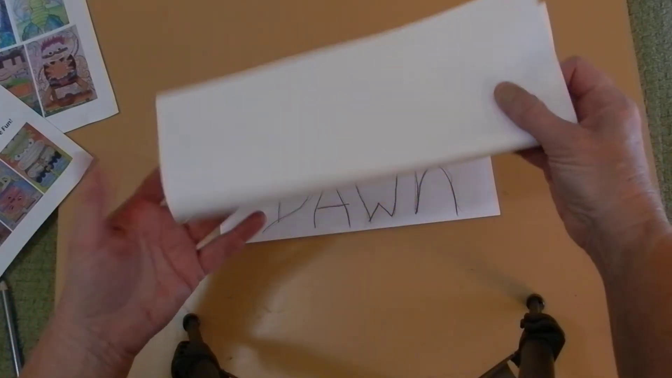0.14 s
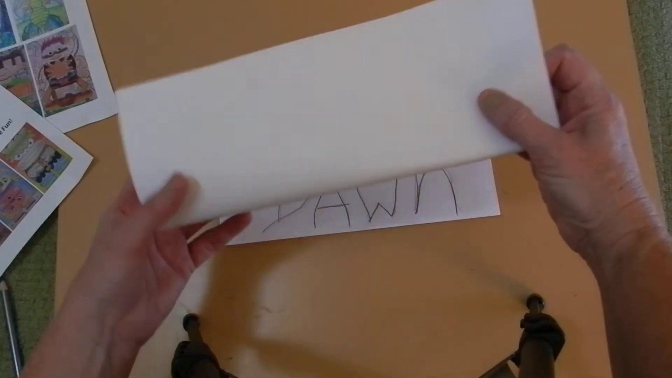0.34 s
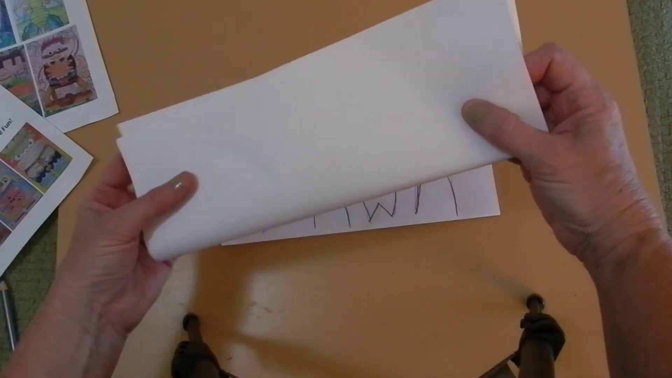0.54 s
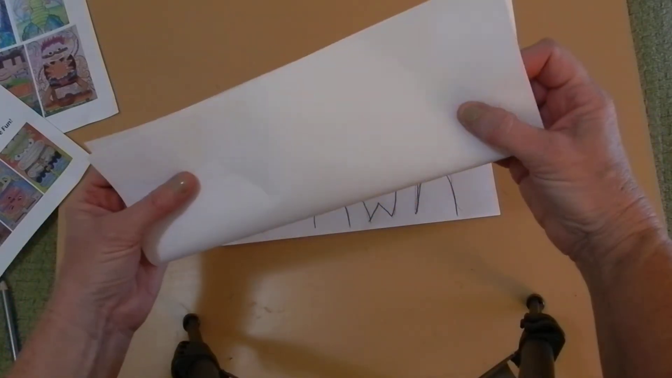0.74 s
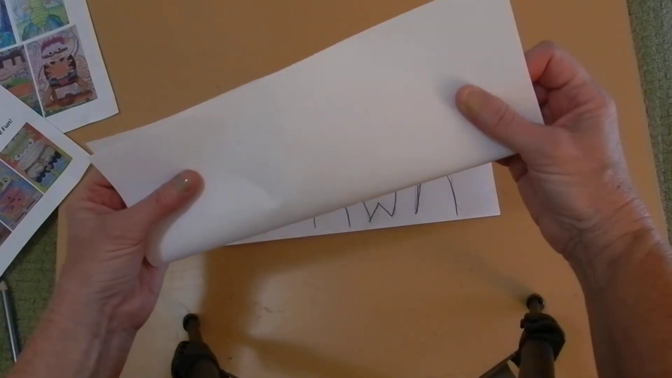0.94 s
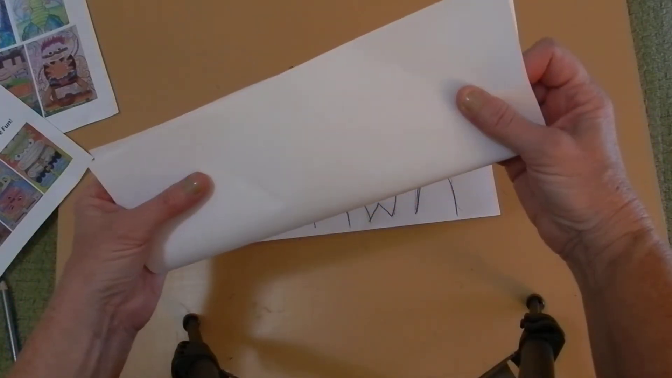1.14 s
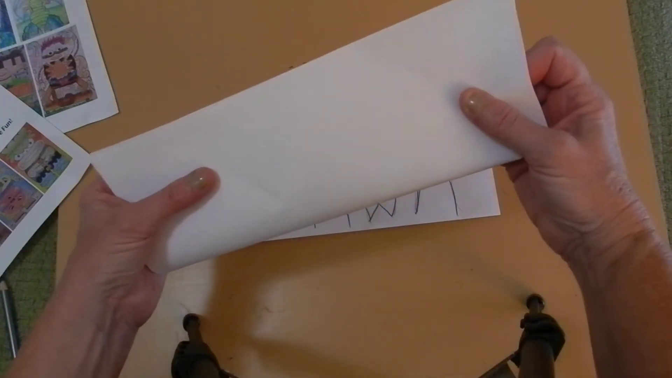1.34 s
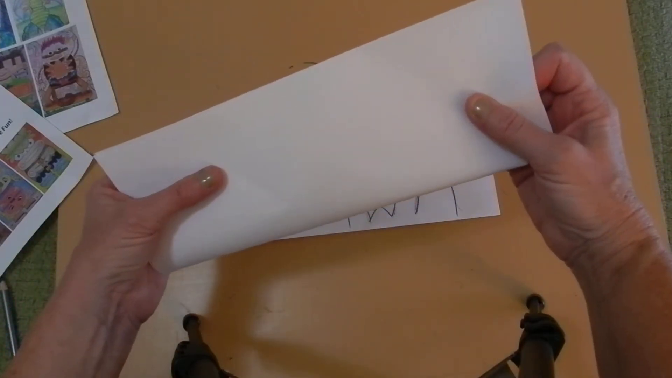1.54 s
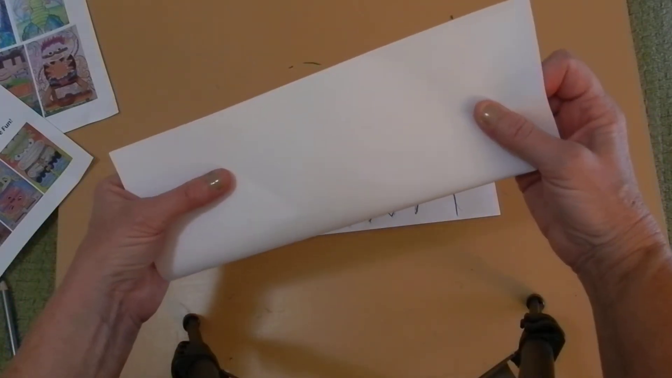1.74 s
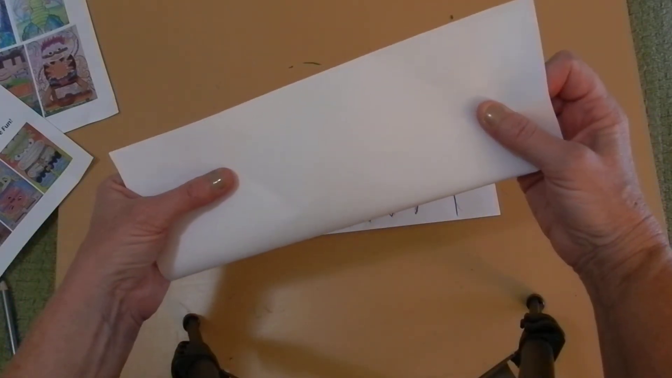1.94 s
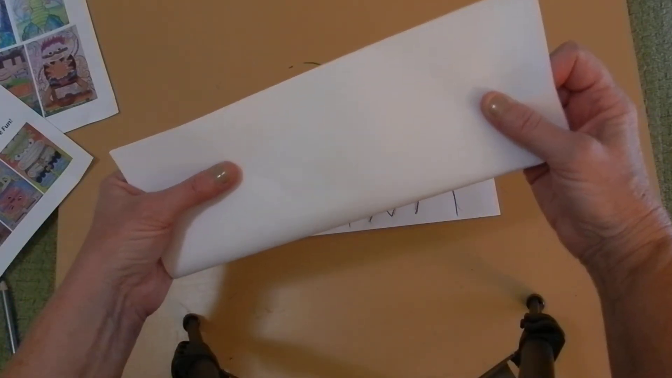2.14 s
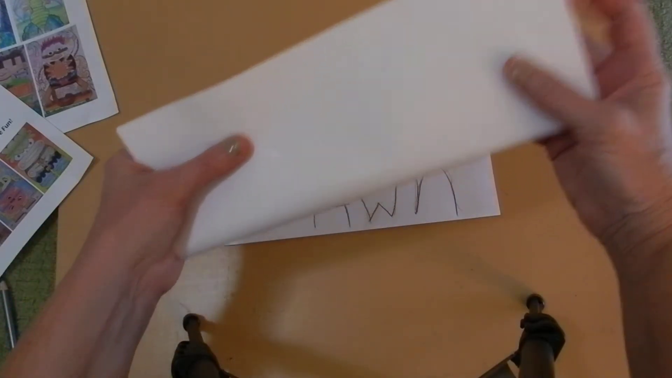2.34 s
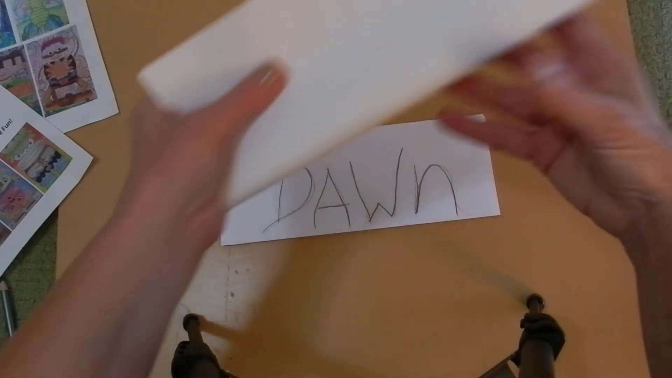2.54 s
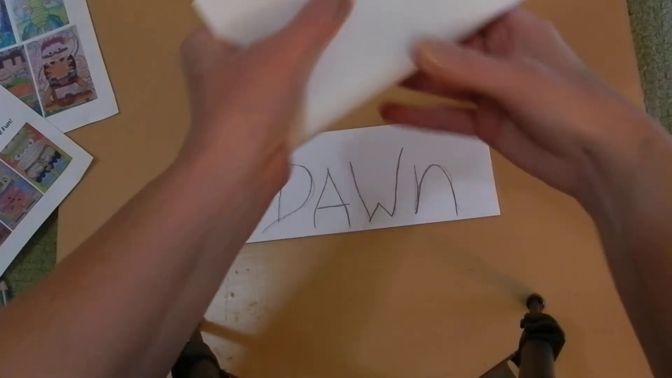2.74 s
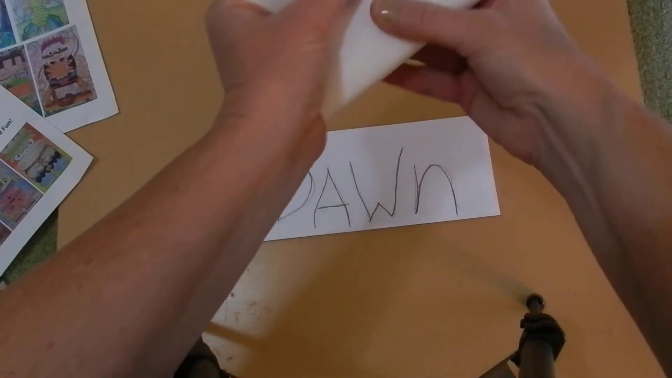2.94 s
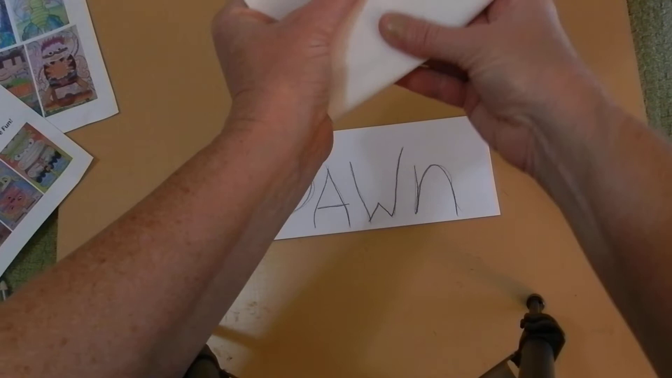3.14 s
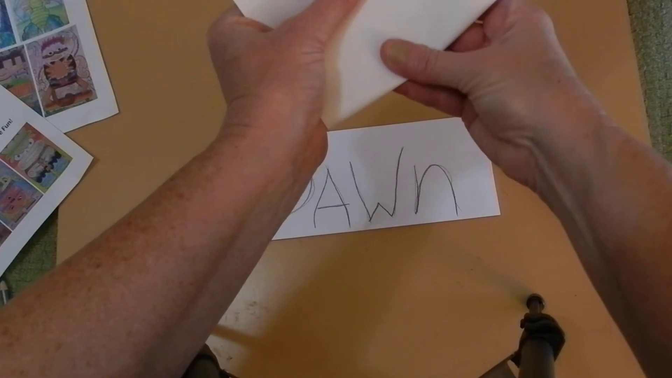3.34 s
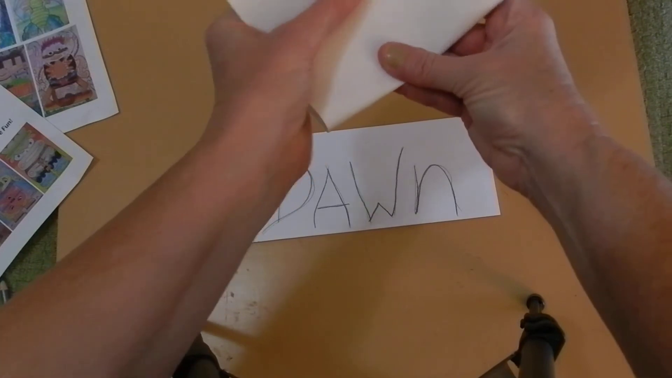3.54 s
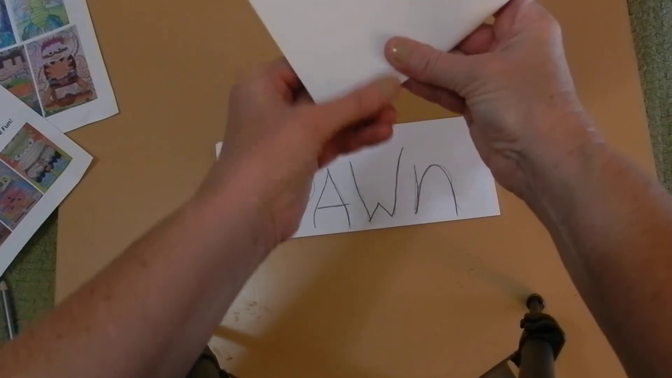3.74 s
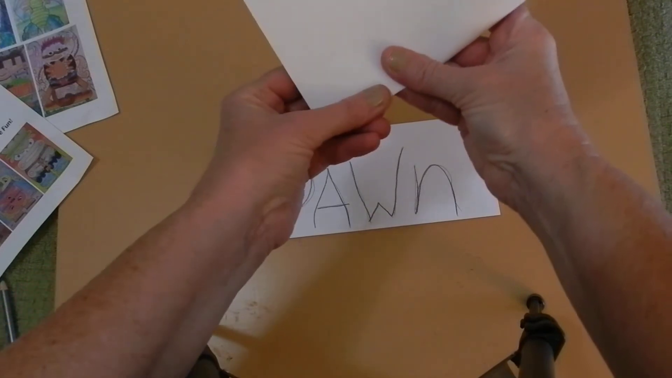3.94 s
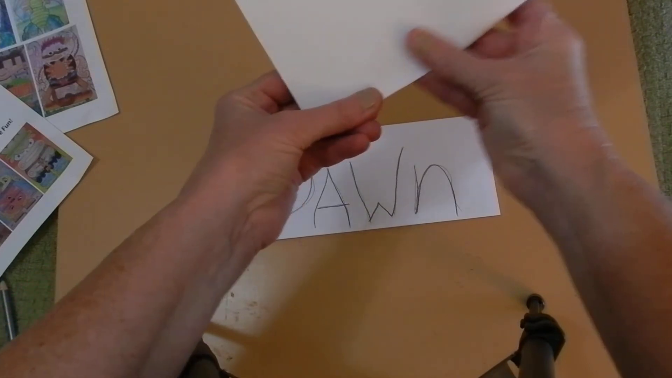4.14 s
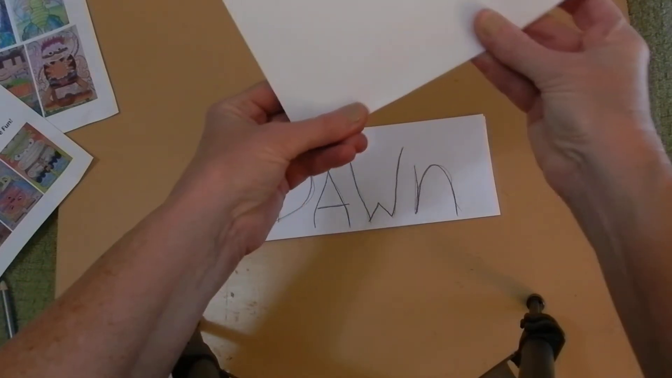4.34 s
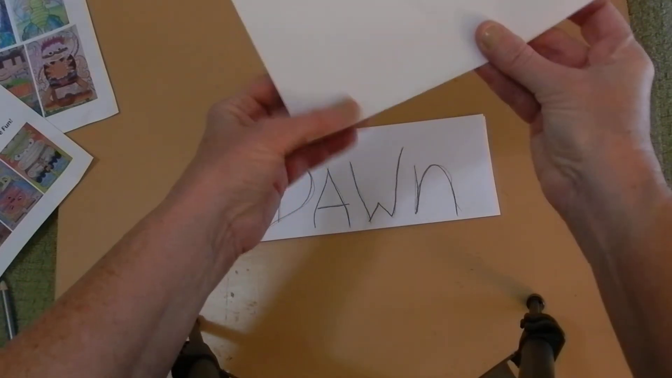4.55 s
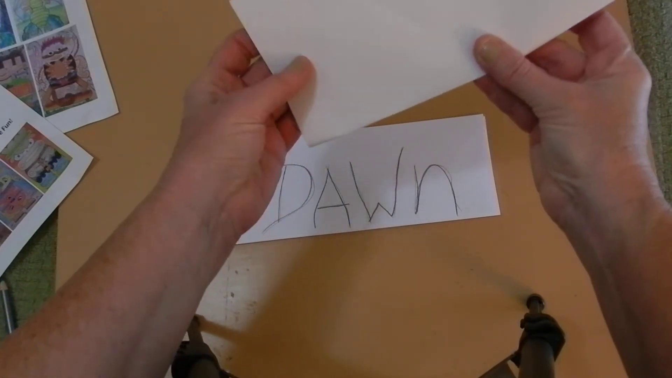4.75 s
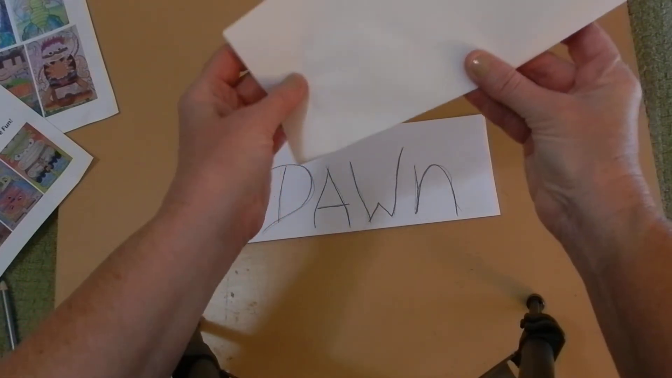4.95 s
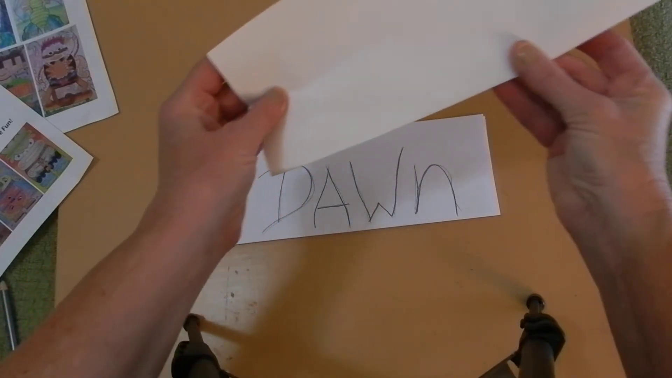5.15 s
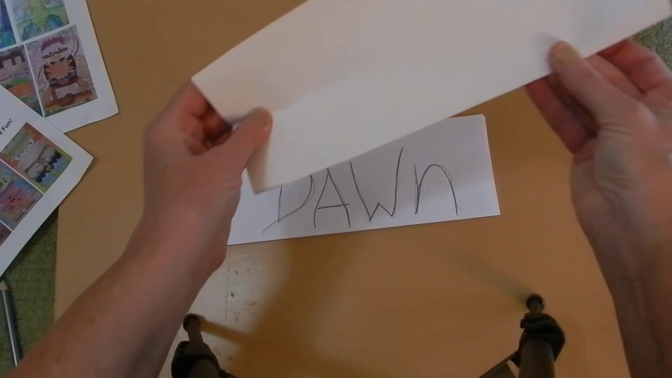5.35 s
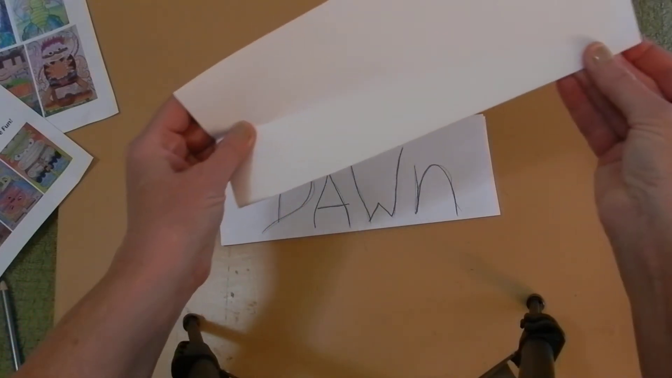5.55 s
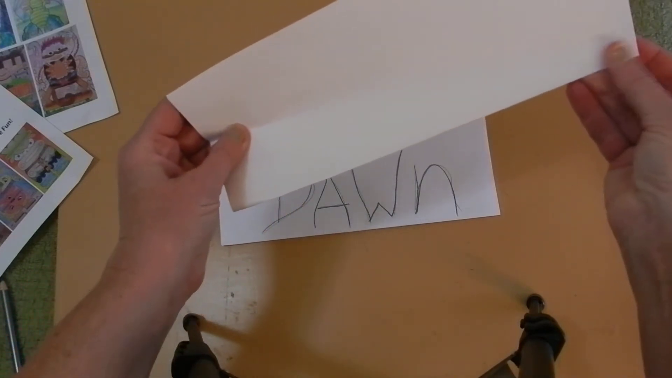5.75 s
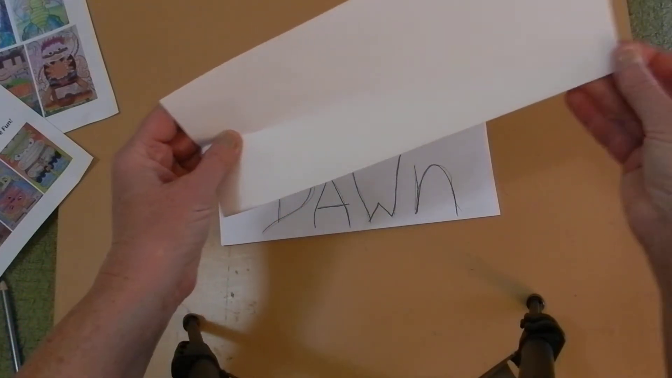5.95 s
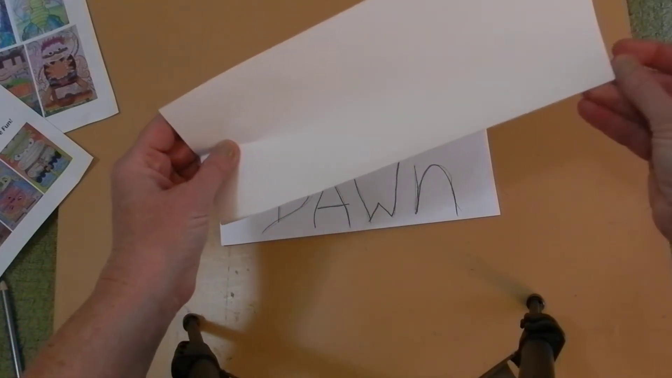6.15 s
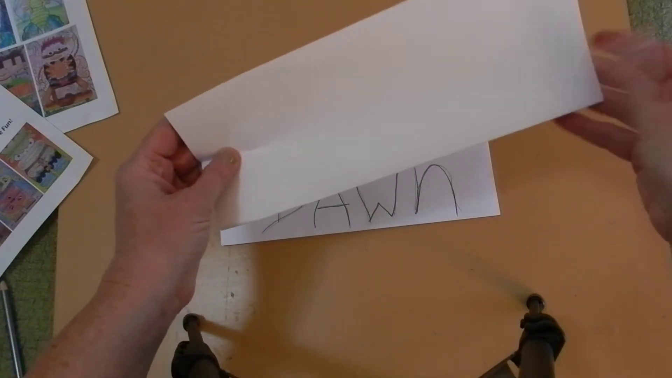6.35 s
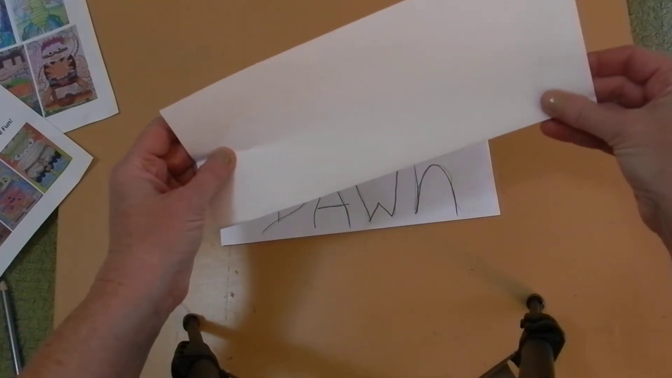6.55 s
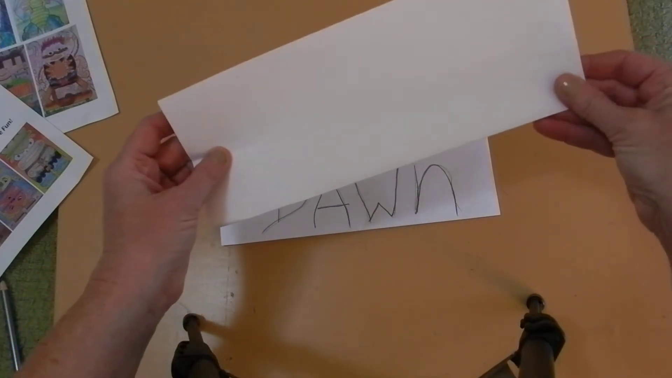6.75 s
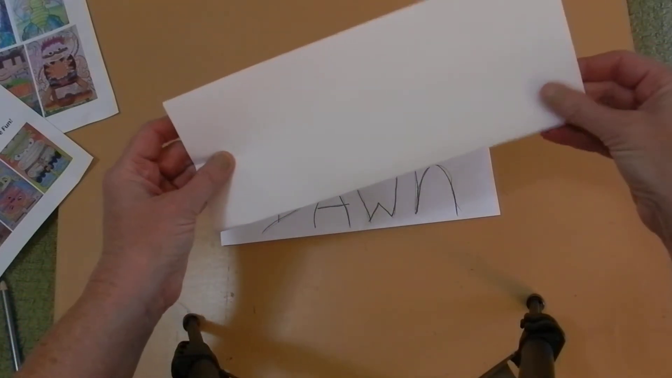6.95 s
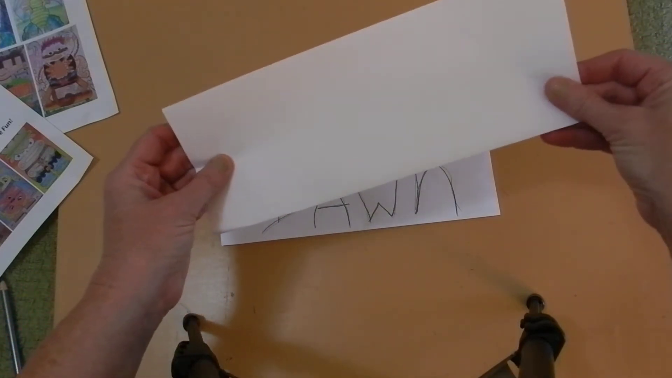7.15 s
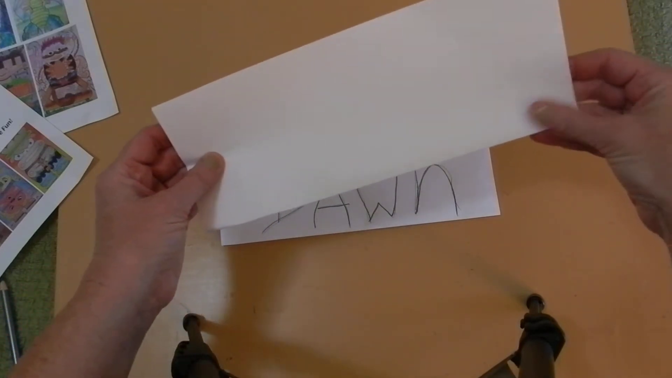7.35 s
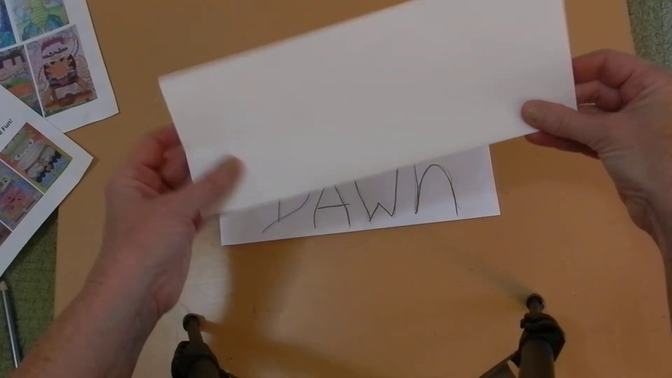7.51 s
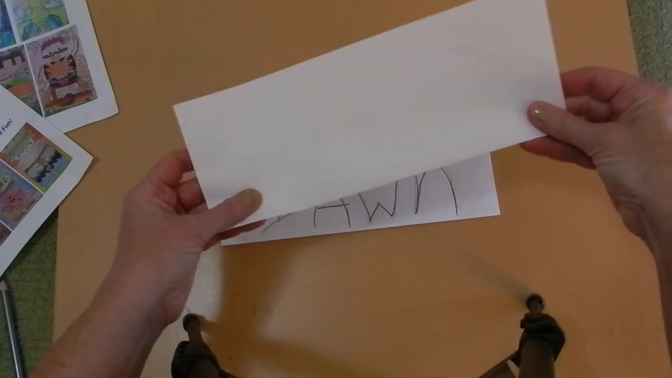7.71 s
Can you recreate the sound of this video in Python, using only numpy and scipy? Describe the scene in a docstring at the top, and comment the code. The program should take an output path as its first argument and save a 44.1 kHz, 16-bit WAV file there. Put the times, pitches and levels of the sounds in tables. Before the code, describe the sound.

A sheet of paper is handled close to a stereo microphone in a small, quiet room with faint low rumble and hiss. From 0 to 1.3 seconds, short dry rustles mix with light crackles and small pops around 0.1, 0.4 and 0.8. It calms until 2.3, with only brief rubs and soft taps. At about 2.4 a tight cluster of strong pops and low flaps bursts out. From 3.0 to 4.1 the sheet buckles repeatedly, the heaviest snap with a flap at 3.25 and another crackly one near 3.55. Between 4.1 and 5.6 fingers slide along the fold in airy, bright hisses, with a dull pop at 5.0. A sharp, bright snap comes at 5.97. Afterwards, gentle rubbing and tiny crinkles continue, with soft flaps and a last pop around 7.6 to 7.7 and more rubbing to the end near 7.9.

```python
"""A small room, where two hands bend, fold and crease a sheet of paper above a table, close to a stereo microphone.
The sheet buckles in snaps: sharp filtered pulses with a scraping lead-in and a fluttering tail of noise.
Broad parts flap over as low pulses, and tiny creases tick at random. Strokes of the hands shape coloured noise into
paper rustle and skin hiss; pinching fingers ring the fold, and the held sheet sways as a low noise.
Room rumble and microphone hiss lie beneath."""
import sys
import numpy as np
from scipy import signal
from scipy.fft import rfft, irfft, next_fast_len
from scipy.io import wavfile
from scipy.ndimage import uniform_filter1d, map_coordinates

SR = 44100
rng = np.random.default_rng(int(sys.argv[2]) if len(sys.argv) > 2 else 0)


def persist_wave(psi):
    """Save psi, clipped to +-1, as 16-bit WAV."""
    counts = np.round(np.clip(psi, -1, 1) * 32767).astype(np.int16)
    wavfile.write(sys.argv[1], SR, np.atleast_2d(counts).T)


N = 347508

# Buckles of the sheet: start_s, level_db (before the common pulse gain), pitch_hz of the buckling patch,
# crack_db relative to the pop, top_db tilt of the crack's treble, slack_db of the sheet around it
BUCKLE_EVENTS = [(0.0793, -50.5, 1160, -4, 10, 4), (0.1239, -40, 1930, 0.5, 12, 3.5),
                 (0.1282, -34, 1930, -8, 2, 4.5), (0.4241, -38, 1660, -10, 0, 1),
                 (0.431, -38.5, 1620, -8, -5, 1), (0.4417, -40, 1560, -16, 0, 0),
                 (0.7522, -34.5, 1780, -12, -10, 0), (0.7836, -32, 980, -11.5, -9, -0.5),
                 (0.923, -44.5, 865, -14, -4, 2), (1.14, -53, 1080, -16, 0, 2),
                 (1.301, -41, 1530, -2, 5, -4), (1.629, -62, 2000, -15, 8, 3),
                 (2.333, -47, 1670, -1, 4, -14), (2.388, -26, 1110, -5.5, -17, 0.5),
                 (2.401, -35, 1560, -1.5, -15, 5.5), (2.4142, -24.5, 1970, -9, -20, -2.5),
                 (2.4412, -36, 1130, -10, 0, 4.5), (2.453, -35.5, 1060, -18, 0, 2),
                 (2.683, -49, 2000, 4.5, 9, 2), (2.7046, -38.5, 1510, -6, 2, -5),
                 (2.945, -47, 1490, 3, -3, 3), (2.996, -28, 950, -10.5, -10, -1),
                 (3.0079, -33.5, 826, -10, -4, 2), (3.0159, -35, 900, -14, 0, -15),
                 (3.0273, -45, 1050, 4.5, -8, -3), (3.2271, -46.5, 910, -14, 0, 5.5),
                 (3.256, -19.5, 1020, -7.5, -5, 0), (3.4122, -52.5, 1360, 6, 7, -1),
                 (3.4536, -41, 780, -1.5, 7, 2.5), (3.4664, -37.5, 920, -0.5, 2, 1.5),
                 (3.4761, -43.5, 750, 6, -2, -2.5), (3.516, -53, 760, 0, 0, 6.5),
                 (3.5444, -28, 1170, 0, -13, 2.5), (3.6716, -47, 1540, 7, 2, 1.5),
                 (3.7729, -30.5, 1000, -9, -8, -5.5), (3.824, -35.5, 1450, -0.5, -6, -4),
                 (3.849, -40.5, 940, -10, 3, -2), (4.113, -29.5, 1010, -1.5, -8, -2),
                 (4.627, -45.5, 830, -20, 0, -3), (4.7187, -36.5, 1110, -10.5, -2, 1.5),
                 (4.7576, -43.5, 820, -25, 0, -0.5), (4.7977, -46, 1190, -9, 3, 0.5),
                 (5.0054, -26, 940, -18, -5, -3.5), (5.193, -41, 1220, -1, 2, -3.5),
                 (5.3823, -45, 810, -27, 0, -1.5), (5.9722, -35.5, 1500, 11, 17, -6),
                 (5.9754, -20.5, 1750, -6, 7, -1), (5.986, -28.5, 2080, -11, -9, 2.5),
                 (6.133, -44.5, 1620, 6, 12, -1), (6.451, -55, 1040, -1, 13, 5),
                 (6.4614, -44, 1450, -16, 13, 3.5), (7.5528, -35.5, 1330, -37, 0, -6.5),
                 (7.7123, -30, 1510, -9, -12, -1)]
# Soft flaps of the whole sheet and finger taps: start_s, level_db (before the common flap gain)
FLAP_EVENTS = [(0.918, -37.5), (1.141, -40.5), (2.124, -39), (2.248, -44), (2.402, -30), (2.464, -32.5),
               (3.012, -29.5), (3.067, -31.5), (3.177, -41.5), (3.252, -23), (3.359, -38), (3.464, -32.5),
               (3.552, -25.5), (3.904, -39.5), (4.212, -37), (4.625, -33), (4.72, -42), (4.80, -43),
               (4.936, -35), (5.501, -43.5), (5.975, -40), (6.452, -37), (6.524, -43), (7.002, -38),
               (7.352, -38.5), (7.417, -46), (7.44, -62), (7.614, -42), (7.621, -39), (7.646, -35.5)]
# Strokes of the hands over the sheet: start_s, length_s, rub_db of paper on paper, skin_db of skin on paper
# (both levels before the friction trims and wobble)
HAND_STROKES = [(0.0, 0.21, -48, -51), (0.247, 0.098, -49.5, -50.5), (0.347, 0.18, -49, -53),
                (0.523, 0.22, -54, -59), (0.683, 0.13, -48.5, -56.5), (0.81, 0.11, -49.5, -55.5),
                (0.93, 0.31, -53.5, -59.5), (1.028, 0.059, -46.5, -51.5), (1.256, 0.083, -46.5, -53.5),
                (1.425, 0.096, -56.5, -63), (1.607, 0.13, -44.5, -52), (1.816, 0.063, -63, -67),
                (1.976, 0.037, -57.5, -65), (2.052, 0.22, -55.5, -62.5), (2.213, 0.077, -47, -47.5),
                (2.305, 0.14, -42, -48), (2.458, 0.09, -50.5, -50), (2.60, 0.048, -56.5, -67),
                (2.667, 0.079, -51, -47), (2.76, 0.22, -49.5, -51), (2.976, 0.096, -47, -53),
                (3.084, 0.06, -44.5, -47.5), (3.14, 0.076, -56, -46), (3.227, 0.05, -38.5, -48),
                (3.289, 0.092, -51.5, -50), (3.445, 0.23, -48.5, -52.5), (3.688, 0.097, -49, -44),
                (3.792, 0.063, -46.5, -55.5), (3.88, 0.08, -61.5, -63.5), (4.039, 0.18, -44.5, -47),
                (4.103, 0.26, -46.5, -42.5), (4.487, 0.062, -52, -50), (4.584, 0.043, -61, -50.5),
                (4.653, 0.075, -62, -53.5), (4.752, 0.5, -58, -59.5), (4.952, 0.31, -47.5, -44.5),
                (5.227, 0.29, -50.5, -44.5), (5.501, 0.14, -52, -48), (5.729, 0.083, -51.5, -48),
                (5.84, 0.066, -59, -47), (5.936, 0.066, -41, -43), (6.024, 0.09, -54, -52.5),
                (6.435, 0.03, -68, -50), (6.566, 0.20, -53.5, -54), (6.766, 0.095, -52.5, -52.5),
                (6.902, 0.047, -61, -52), (7.0, 0.091, -66, -69), (7.085, 0.074, -53, -52.5),
                (7.167, 0.27, -55.5, -55), (7.305, 0.054, -51.5, -46.5), (7.47, 0.051, -57, -54),
                (7.554, 0.22, -52.5, -54), (7.773, 0.10, -52, -49)]
# How widely the folded sheet gapes: time_s, gape (0 pressed flat - 1 open loop)
SHEET_GAPE = [(0, 0.53), (1.0, 0.92), (1.7, 0.92), (2.3, 0.91), (2.8, .4), (3.2, 0.67), (3.7, 0.44),
              (4.2, 0.67), (5.1, 0.65), (5.5, 0.024), (6.8, 0.16), (7.8, 0.15)]
# Fingers run along the pinched fold: start_s, length_s, level_db (before the stroke's arch and wobble),
# first and last share of the upper resonance (0-1)
FOLD_PINCHES = [(4.13, 0.22, -48, 0.9, .98), (4.49, 0.034, -53, .05, .02), (5.006, 0.43, -47.5, .95, 0.17),
                (5.32, 0.3, -46.5, 0.75, .02), (5.748, 0.04, -49, .03, .03), (5.87, 0.04, -59, .1, .1),
                (7.80, 0.08, -52, 0.2, .03)]
# The hands shift their grip and sway the held sheet: time_s, level_db (before trim and wobble)
GRIP_SWAY = [(0.0, -58.5), (0.13, -62), (1.05, -58.5), (1.93, -62), (2.37, -56.5), (2.79, -57.5),
             (3.11, -60), (3.4, -56.5), (3.95, -64), (4.98, -57), (5.27, -63.5), (5.93, -55.5), (6.14, -63),
             (7.88, -55.5)]

# Relative spectra of the pulses: freq_hz, level_db per Hz
POP_COLOUR = [(300, -32.5), (620, -10.5), (900, 1), (1250, -2.5), (1850, -2.5), (2350, -9), (4000, -29)]  # the buckling patch
FLEX_COLOUR = [(50, -32), (130, 0.5), (240, -4), (330, 1.5), (450, 1), (600, -6.5), (1100, -36.5)]  # low bending of the sheet
CRACK_COLOUR = [(1500, -11), (2600, -7.5), (3300, -1.5), (4100, -4.5), (5200, -2.5), (7500, -6.5),
                (11000, -9), (16000, -10.5)]  # cracking fibres
FLAP_COLOUR = [(40, -25), (110, -10), (190, -3.5), (330, -2.5), (450, -4.5), (600, -10), (1200, -20.5),
               (4000, -65)]  # a broad part turning over
# Relative spectra of the noises: freq_hz, level_db per Hz
RUB_FLAT_COLOUR = [(300, -6.5), (620, -4.5), (820, -3), (1150, -2), (1450, -1.5), (1900, -8.5),
                   (2500, -7.5), (6000, -18.5), (15000, -33)]  # rustle of the flat sheet
RUB_OPEN_COLOUR = [(300, -5), (700, -21.5), (1100, -5), (1380, -8), (1650, 0), (1950, -1), (2250, -5),
                   (2700, -12.5), (3300, -9), (6000, -15.5), (15000, -49)]  # rustle of the open sheet
SKIN_LIGHT_COLOUR = [(900, -12), (2500, -5), (3300, -5.5), (4200, -2.5), (5500, 1), (7500, -1),
                     (9500, -2.5), (11500, -3), (14000, -6), (16000, -10)]  # hiss of a light fingertip
SKIN_FIRM_COLOUR = [(1500, -12), (3300, -5), (5500, 1), (7500, -0.5), (9500, -1), (11500, 0), (14500, -5),
                    (16000, -8.5)]  # hiss of a firmly pressed fingertip
SWAY_COLOUR = [(60, -10), (130, -11), (220, -0.5), (320, 3), (440, 1), (600, -5), (850, -13.5), (1600, -34),
               (4000, -50)]  # swaying of the held sheet
AIR_COLOUR = [(15, -39), (25, -30), (64, -6.5), (122, -3), (148, -6.5), (178, -10), (233, -15.5),
              (267, -13), (469, -23), (871, -18.5), (1270, -21), (2700, -29.5), (5880, -29), (9550, -32),
              (15500, -34)]  # room rumble and microphone hiss

# Resonances of the pinched fold, lower then upper: centre_hz, width_hz
FOLD_RESONANCES = [(5400, 950), (7500, 1700)]
# Standing waves between sheet, table and nearby walls: centre_hz, width_hz, level_db relative to the direct sound
NOOK_MODES = [(240, 29, -6), (322, 22, -3), (430, 30, -8.5), (756, 45, -8.5), (833, 35, -4.5),
              (962, 35, -6), (1142, 21, -6.5), (1404, 14, -0.5), (1557, 20, -7), (1652, 21, -5),
              (1970, 17, -8), (2160, 16, -13), (3090, 21, -6)]
# Decay of the room: freq_hz, t60_s
ROOM_DECAY = [(150, 0.29), (1200, 0.47), (4000, 0.81), (14000, 0.16)]
# Likeness of left and right noise: freq_hz, correlation (limited to -1..1)
STEREO_LIKENESS = [(60, 1.5), (300, 0.01), (1300, 0.81), (3000, 0.5), (7000, 0.43), (15000, 0.05)]
# Balance of the microphone pair: freq_hz, left_minus_right_db
STEREO_LEAN = [(100, 1.5), (400, 2), (900, 2.5), (2000, 0), (4400, -2), (8000, -4), (11000, -1),
               (15000, 1.5)]

USUAL_DB, USUAL_HZ = -39.5, 1180  # a middling buckle
# Low flex: greatest for gentle buckles of broad patches in a slack sheet
FLEX_DB, FLEX_PER_DB, FLEX_DB_PER_OCTAVE = -4.5, -0.3047, -5
# After-flutter: least for hard snaps in a taut sheet
AFTER_DB, AFTER_PER_DB = -8.5, -0.25
# A stroke gets going (a long one more slowly), is fastest midway and dies away
ATTACK_S, RISE_SHARE, RELEASE_DB_PER_S, ARCH_DB = 0.028, 0.065, 218, 1
RADIATE_HZ = 89.5  # below this the rubbed sheet hardly radiates
TOP_HZ = 15900  # band limit of the recorder


def snaps(seconds=0.0034, shiver=0.11, shiver_t60=0.015, lead=.02, lead_t60=0.04, lead_db=-4, flutter_t60=0.17):
    """Each buckle is a brief scrape, a sharp pulse that shivers for a few ms, then a diffuse flutter of the sheet."""
    out = np.zeros((2, N))
    t = np.arange(SR // 5) / SR
    for s, db, pitch_hz, crack_db, top_db, slack_db in BUCKLE_EVENTS:
        harder_db = db - USUAL_DB
        octaves = np.log2(pitch_hz / USUAL_HZ)
        flex_db = FLEX_DB + slack_db + FLEX_PER_DB * harder_db + FLEX_DB_PER_OCTAVE * octaves
        after_db = AFTER_DB + slack_db + AFTER_PER_DB * harder_db
        colour = pitch_hz, flex_db, crack_db, top_db

        # the snap: one impulse plus a short shiver, with the energy set by the click and the common gain
        click = buckle(*colour, ripple_db=3.0)
        noise = unit(rng.standard_normal(len(t)) + 0.64 * rng.standard_normal((2, len(t))))
        force = shiver * noise * amp(-60 * t / shiver_t60)
        force[:, 0] += 1
        direct = signal.fftconvolve(click, force, axes=1)
        direct *= np.linalg.norm(click) / np.linalg.norm(direct) * np.sqrt(seconds * SR)
        add(out, s - .0002, amp(db) * direct)

        # the paper strains before it gives way, and flutters in uneven bursts afterwards
        before = np.maximum(lead - t, 0)
        after = np.maximum(t - lead, 0)
        strain = amp(lead_db - 60 * before / lead_t60)
        release = (1 - amp(lead_db)) * (1 - np.exp(-after / 0.0027))
        bursts_db = 2.0 * wobble(302, size=len(t))
        decay = amp(after_db + bursts_db - 60 * (after - .01) / flutter_t60)
        flutter = noise * (strain + release) * decay
        body = buckle(*colour, ripple_db=2.5, focus_db=8)
        add(out, s - lead, amp(db) * signal.fftconvolve(body, flutter, axes=1))
    return out


def buckle(pitch_hz, flex_db, crack_db, top_db, ripple_db, focus_db=9):
    """The pulse of one buckle: a pop of the patch, a low flex of the sheet and a crack of fibres."""
    patch = lambda hz: focus_db / (1 + (np.log2((hz + 1) / pitch_hz) / .5) ** 2)
    top = lambda hz: along([(4500, 0), (11000, top_db)], hz)
    pop = pulse(POP_COLOUR, ripple_db, apart=0.17, shape=patch)
    flex = pulse(FLEX_COLOUR, ripple_db, apart=0.067)
    crack = pulse(CRACK_COLOUR, .5 * ripple_db, apart=1, shape=top)
    return pop + amp(flex_db) * flex - amp(crack_db) * crack


def flaps(level_db=18, flutter=0.047, t60=0.12):
    """A broad part of the sheet flips over: a low push that flutters out."""
    out = np.zeros((2, N))
    t = np.arange(SR // 8) / SR
    for s, db in FLAP_EVENTS:
        force = flutter * rng.standard_normal((1, len(t))) * amp(-60 * t / t60)
        force[:, 0] += 1
        push = pulse(FLAP_COLOUR, ripple_db=2.5, apart=.3)
        add(out, s, amp(db + level_db) * signal.fftconvolve(push, force, axes=1))
    return out


def crinkles(drive_db, count=150, level_db=11, spread_db=9, flex=1.0, crack=.18):
    """Tiny creases give way at random, stronger while the paper is rubbed."""
    out = np.zeros((2, N))
    for when, strength in rng.random((count, 2)):
        tick = (pulse(POP_COLOUR, ripple_db=7, apart=0.28)
                + flex * pulse(FLEX_COLOUR, ripple_db=4.5, apart=.3)
                - crack * pulse(CRACK_COLOUR, ripple_db=2, apart=1))
        tick_db = drive_db[int(when * N)] + level_db + spread_db * strength ** 2
        add(out, when * N / SR, amp(tick_db) * tick)
    return out


def friction(rub_db, skin_db, light_db=-53, firm_db=-42):
    """Paper rubs on paper with a hollow rustle; skin catches on the fibres with a fine hiss, brighter when pressed."""
    def blend(first, second, share, patchy_db):
        """Noise that passes from the first colour to the second at equal power."""
        share = np.clip(share, 0, 1)
        return (np.sqrt(1 - share) * rush(lambda hz: amp(along(first, hz)), patchy_db)
                + np.sqrt(share) * rush(lambda hz: amp(along(second, hz)), patchy_db))

    catch_db = 0.9 * wobble(45) + 0.8 * wobble(500)  # shared by paper and skin
    rub_gain = amp(rub_db - 0.96 + catch_db + 0.87 * wobble(120))
    rub = rub_gain * blend(RUB_FLAT_COLOUR, RUB_OPEN_COLOUR, curves(SHEET_GAPE)[0], patchy_db=3.0)
    pressure = (skin_db - light_db) / (firm_db - light_db)
    skin_gain = amp(skin_db + 0.6 + catch_db + 0.36 * wobble(2500))
    skin = skin_gain * blend(SKIN_LIGHT_COLOUR, SKIN_FIRM_COLOUR, pressure, patchy_db=2.1)
    return filtered(rub + skin, lambda hz: hz ** 2 / (hz ** 2 + RADIATE_HZ ** 2))


def sliding():
    """Levels in dB of paper on paper and of skin on paper: overlapping strokes add in power."""
    power = sum((amp([[rub_db], [skin_db]]) * stroke(start, length)) ** 2
                for start, length, rub_db, skin_db in HAND_STROKES)
    return 10 * np.log10(power + 1e-12)


def stroke(start, length):
    """Gain of one hand movement: attack, arched hold, release."""
    t = np.arange(N) / SR - start
    off_centre = np.clip(2 * t / length - 1, -1, 1)
    attack = np.clip(t / (ATTACK_S + RISE_SHARE * length), 0, 1)
    arch_db = ARCH_DB * (.5 - off_centre ** 2)
    release_db = RELEASE_DB_PER_S * np.maximum(t - length, 0)
    return attack * amp(arch_db - release_db)


def crease():
    """The hiss of pinching fingers rings in the narrow gap of the fold, sliding between its two resonances."""
    out, power = np.zeros((2, N)), np.zeros((2, N))
    for start, length, db, first, last in FOLD_PINCHES:
        upper = np.clip(curves([(start, first), (start + length, last)])[0], 0, 1)
        power += (amp(db) * stroke(start, length)) ** 2 * np.array([1 - upper, upper])
    for gain, (centre, width) in zip(np.sqrt(power), FOLD_RESONANCES):
        gap = lambda hz: (1 + ((hz - centre) / width) ** 2) ** -2
        out += gain * amp(0.26 * wobble(34)) * rush(gap, patchy_db=3.5)
    return out


def grip():
    """Low, uneven swaying of the held sheet."""
    db, = curves(GRIP_SWAY)
    sway = rush(lambda hz: amp(along(SWAY_COLOUR, hz)), patchy_db=3.0)
    return amp(db - 0.5 + 2.4 * wobble(55)) * sway


def nook(hz, trim_db=-1):
    """The direct sound plus the short ringing of the space around the hands."""
    ringing = sum(amp(db) * 1j * hz * width / (centre * centre - hz * hz + 1j * hz * width)
                  for centre, width, db in NOOK_MODES)
    return amp(trim_db) * (1 + ringing)


def ports(hz, lead=.000011):
    """Response of the two microphone ports: each has its own colour, and the left hears the paper a little sooner."""
    half = np.array([[.5], [-.5]])  # left, right
    return amp(half * along(STEREO_LEAN, hz)) * np.exp(2j * np.pi * hz * lead * half)


def room(x):
    """A small room's tail, each frequency dying at its own speed."""
    hz, t, z = signal.stft(rng.standard_normal((2, SR // 2)), SR, nperseg=256)
    decay = amp(-60 * t / along(ROOM_DECAY, hz)[:, None])
    build_up = 1 - np.exp(-t / 0.0057)
    tail = signal.istft(z * decay * build_up, SR, nperseg=256)[1]
    return signal.fftconvolve(x, tail / np.linalg.norm(tail[0]), axes=1)[:, :N]


def background(level_db=-54.5):
    """Steady room rumble and microphone hiss: coloured noise, partly shared by the two sides."""
    noise = rng.standard_normal((2, N)) + 0.25 * rng.standard_normal(N)
    return amp(level_db) * unit(filtered(noise, lambda hz: amp(along(AIR_COLOUR, hz))))


def pulse(colour, ripple_db, apart, shape=lambda hz: 0, size=2048):
    """A causal stereo pulse, mean energy 1 a side, with chance resonances that differ between sides by apart."""
    hz = np.fft.rfftfreq(size, 1 / SR)
    knots = rng.standard_normal(60) + apart * rng.standard_normal((2, 60))
    ripple = np.array([map_coordinates(k, [np.log2(1 + hz / 300) * 9]) for k in knots])
    # folding the cepstrum gives minimum phase: the energy comes as early as the colour allows
    cepstrum = irfft(np.log(amp(along(colour, hz) + ripple_db * ripple + shape(hz))))
    cepstrum[:, 1:size // 2] *= 2
    cepstrum[:, size // 2 + 1:] = 0
    return unit(irfft(np.exp(rfft(cepstrum)))) / np.sqrt(size)


def rush(gain, patchy_db):
    """Stereo noise of rms 1 whose colour drifts in patches."""
    z = signal.stft(rng.standard_normal((2, N)), nperseg=512)[2]
    field = uniform_filter1d(rng.standard_normal(z.shape[1:]), size=5, axis=0)  # across frequency
    field = uniform_filter1d(field, size=12, axis=1)  # across time
    pair = signal.istft(z * amp(patchy_db * unit(field)), nperseg=512)[1][:, :N]
    # mid and side are weighted to give the wanted likeness of left and right
    turn = lambda hz: np.arccos(np.clip(along(STEREO_LIKENESS, hz), -1, 1)) / 2
    mid, side = filtered(pair, lambda hz: gain(hz) * np.array([np.cos(turn(hz)), np.sin(turn(hz))]))
    return unit(np.array([mid + side, mid - side]))


def wobble(rate, size=N):
    """A smooth random curve, rate knots a second."""
    knots = rng.standard_normal(int(size * rate / SR) + 4)
    return map_coordinates(knots, [np.arange(size) * rate / SR])


def filtered(x, response):
    """x times a response of frequency."""
    m = next_fast_len(N + 8192)
    return irfft(rfft(x, m) * response(np.fft.rfftfreq(m, 1 / SR)), m)[..., :N]


def add(track, s, sound):
    """Mix a stereo sound into the track at time s."""
    part = track[:, max(round(s * SR), 0):][:, :sound.shape[1]]
    part += sound[:, :part.shape[1]]


def along(points, hz):
    """Read (Hz, value) points on a log axis."""
    f, v = np.transpose(points)
    return np.interp(np.log(hz + 1), np.log(f), v)


def curves(rows):
    """One value per sample for each column after the time."""
    s, *cols = np.transpose(rows)
    return [np.interp(np.arange(N) / SR, s, c) for c in cols]


def amp(db):
    """Decibels to gain."""
    return 10 ** (np.asarray(db) / 20)


def unit(x):
    """Scale to rms 1."""
    return x / np.sqrt(np.mean(x ** 2) + 1e-20)


def scene():
    """All the paper sounds, coloured by the space around the hands; the room answers the snaps, flaps and crinkles."""
    rub_db, skin_db = sliding()
    hits = snaps() + flaps() + crinkles(rub_db)
    paper = hits + friction(rub_db, skin_db) + crease() + grip() + amp(-19.5) * room(hits)
    return filtered(paper, lambda hz: nook(hz) * ports(hz)) + background()


def record(dry):
    """The recorder keeps nothing above its band limit."""
    return filtered(dry, lambda hz: hz < TOP_HZ)


dry = scene()
out = record(dry)
persist_wave(out)
```